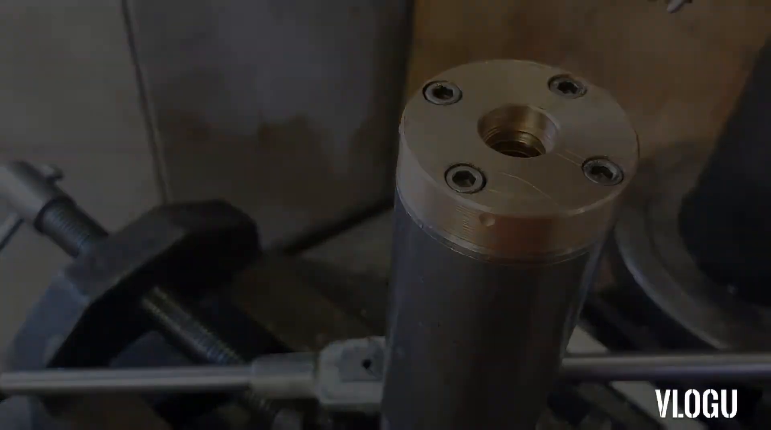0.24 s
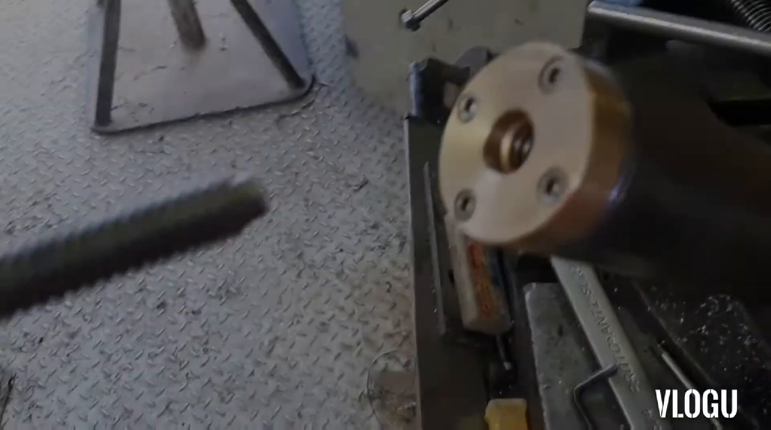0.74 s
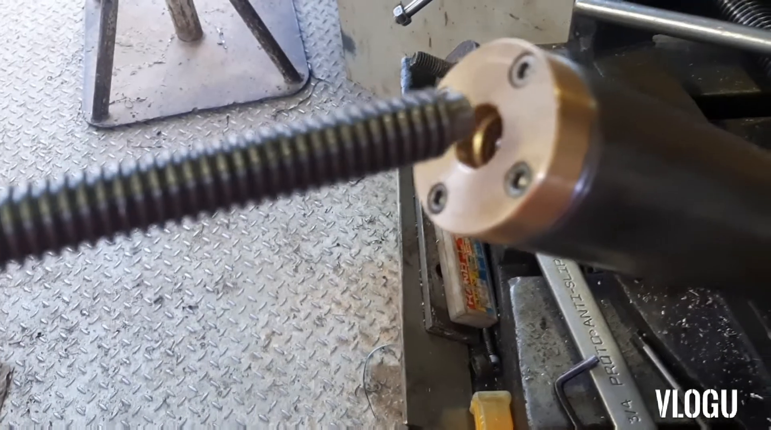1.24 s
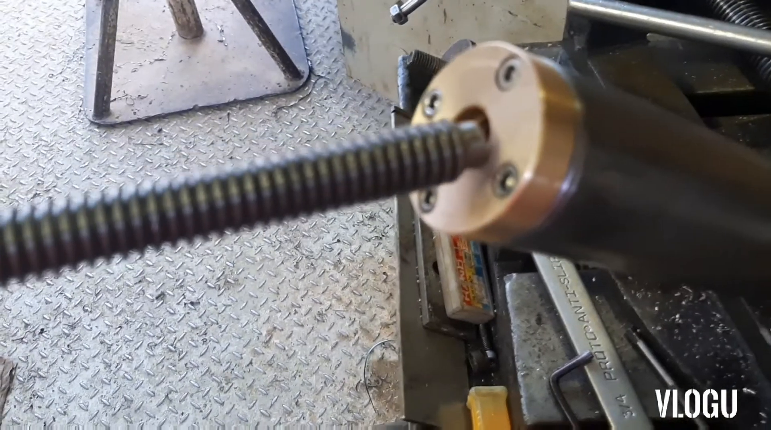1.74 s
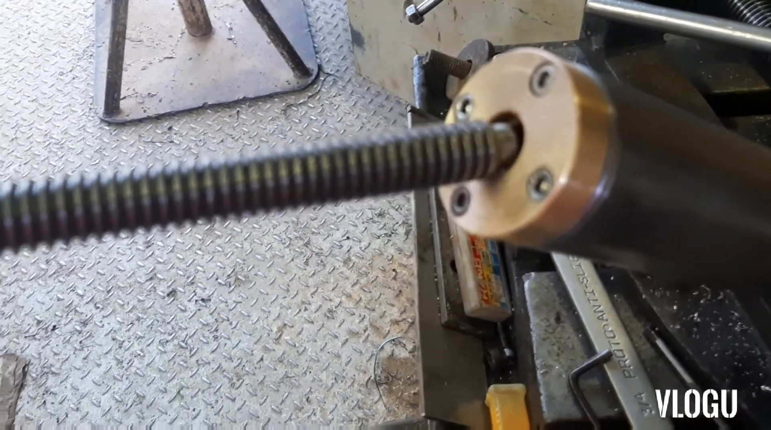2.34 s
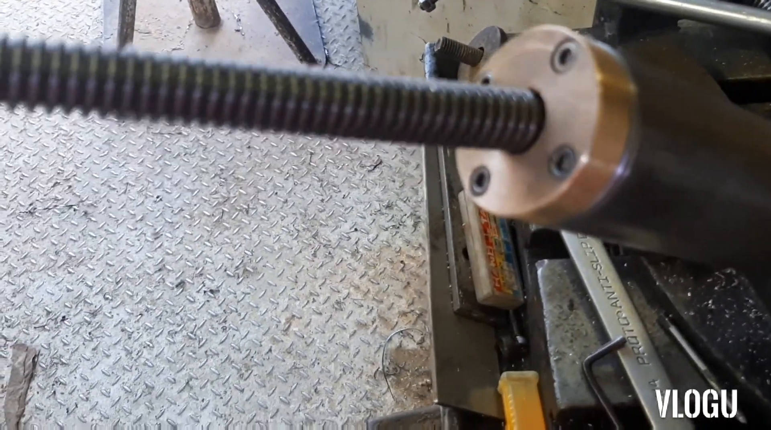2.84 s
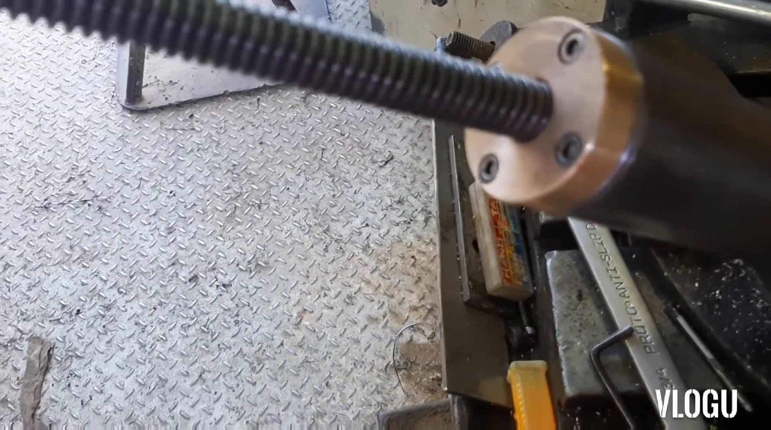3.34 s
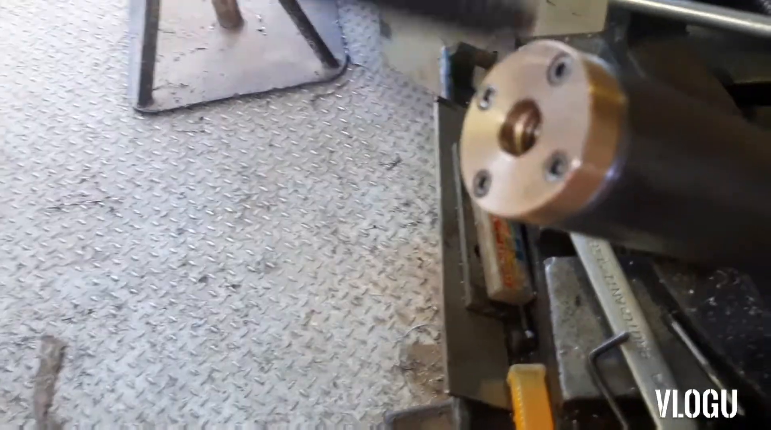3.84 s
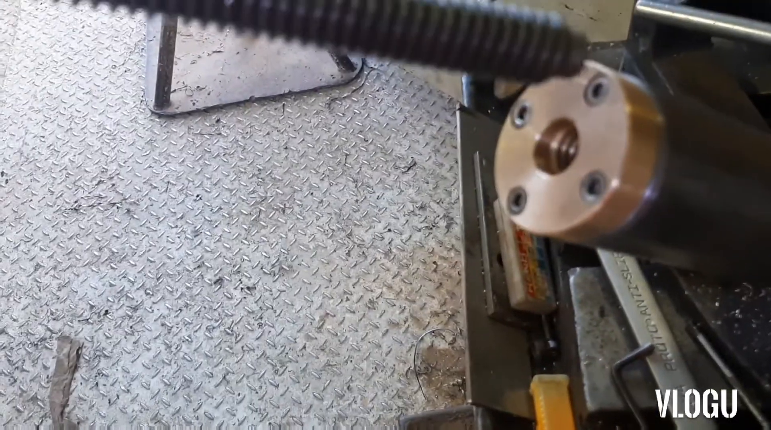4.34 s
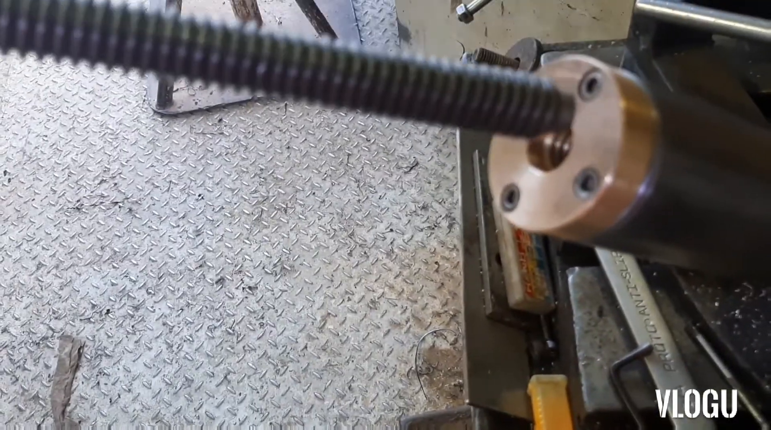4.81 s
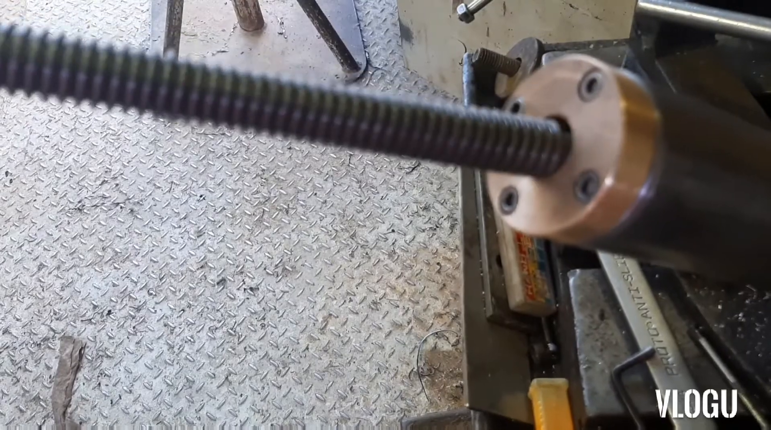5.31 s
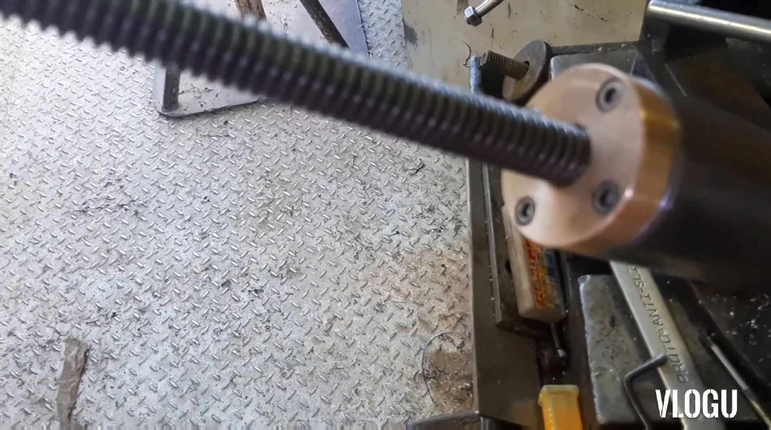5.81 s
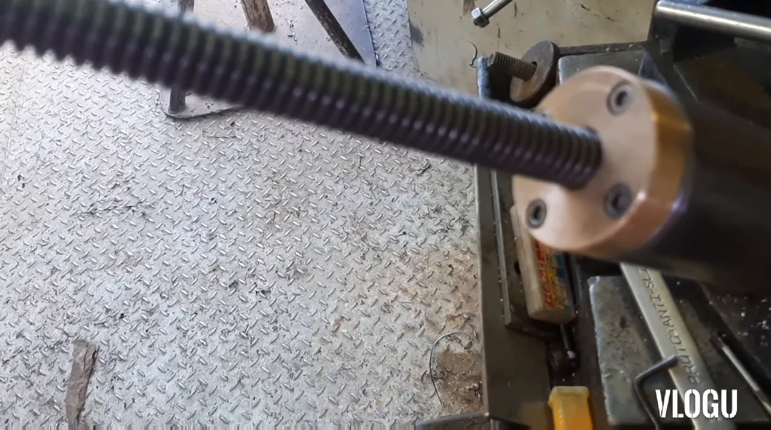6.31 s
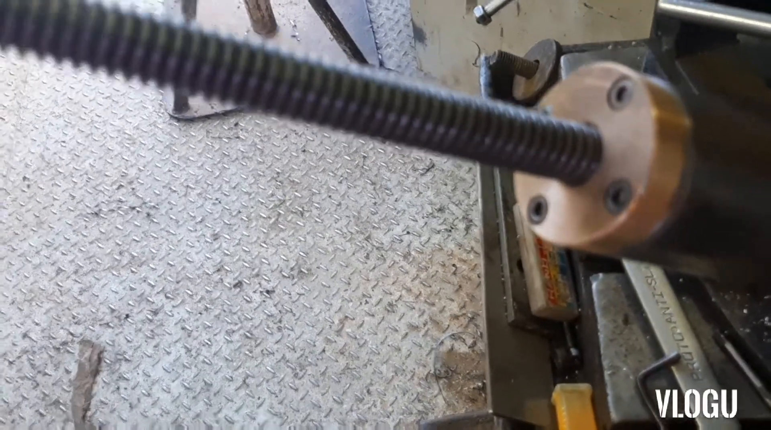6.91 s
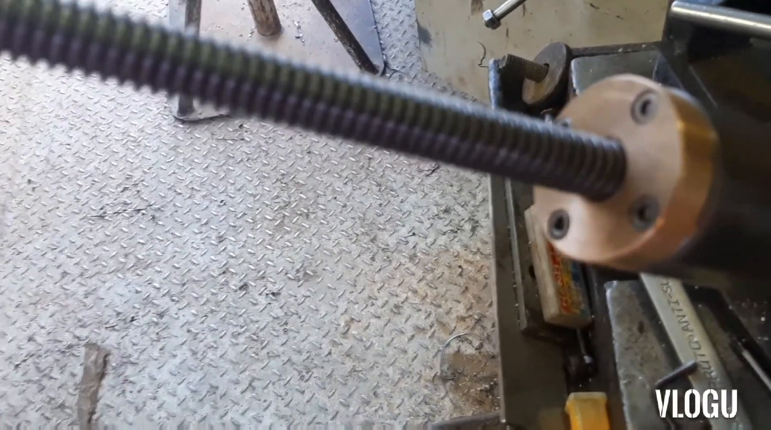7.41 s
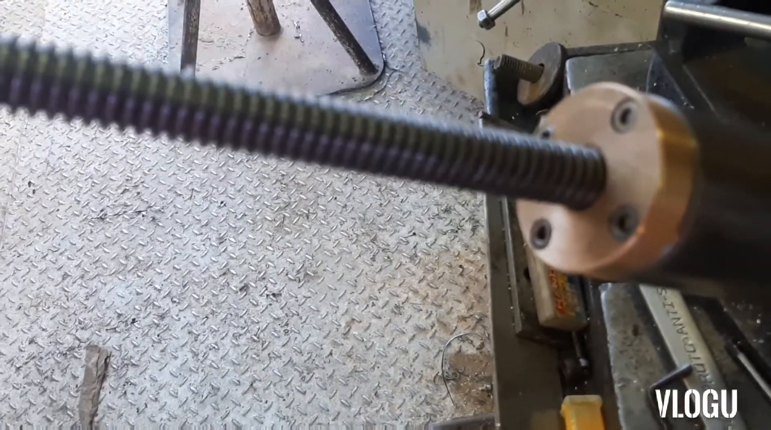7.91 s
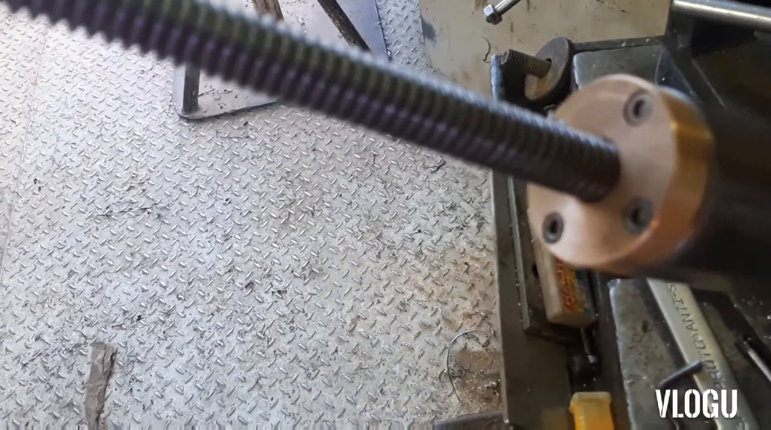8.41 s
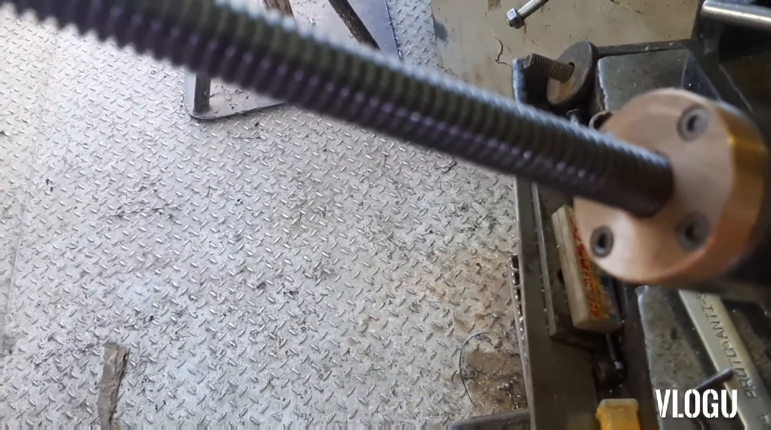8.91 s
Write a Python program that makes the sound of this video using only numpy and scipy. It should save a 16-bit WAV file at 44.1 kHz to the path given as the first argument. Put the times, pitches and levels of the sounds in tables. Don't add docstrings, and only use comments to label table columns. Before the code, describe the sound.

Low, beating motor drone with muffled airy noise fills a small workshop, picked up by a close hand-held microphone. A tiny opening burst is followed by a short dead gap, then the drone resumes quietly and abruptly doubles in level. Over it come a few dry metallic taps, the sharpest ones in quick clusters before four and six seconds, with a slight room reflection. The drone continues to the end.

```python
import sys
import numpy as np
from scipy import signal
from scipy.fft import rfft, irfft
from scipy.io import wavfile

SR = 44100
rng = np.random.default_rng(int(sys.argv[2]) if len(sys.argv) > 2 else 0)


def nominal_scale(level):
    x = np.asarray(level, float) / 20
    return 10 ** x


def wav_record(signal):
    frames = np.transpose(np.atleast_2d(signal))
    bounded = np.clip(frames, -1, 1)
    quanta = np.round(bounded * 32767).astype(np.int16)
    wavfile.write(sys.argv[1], SR, quanta)


N = 403515

# start in seconds, end in seconds, gain in dB, motor time shift in seconds.
STRETCHES = [
    (0, .1257, -6, 1.216),
    (.31, .355, -6, 1.0315),
    (.355, 1.192, -6, 0.),
    (1.192, 9.2, 0, 0.),
]
# time in seconds, extra distance in metres, main hum gain in dB.
HAND_SWAY = [(.6, -.3, .5), (2.3, -.14, 0), (4.3, .13, -.5), (5.5, .02, 1), (6.2, -.1, .5),
             (7.2, .02, -1.3), (8, .08, 0), (9.15, .1, 0)]
# multiple of the pull, level in dB rms.
HUM_TONES = [(1, -26.5), (2, -43), (3, -48.5), (4, -54)]
# shaft order, level in dB rms.
KNOCK_ORDERS = [(2, -60), (3, -42.2), (4, -52.7), (5, -36.8), (6, -39.3), (7, -53), (12, -48), (24, -56),
                (30, -67)]
# shaft orders above the pull, level in dB rms.
GAP_ORDERS = [(1, -37.7), (2, -37.2), (3, -47), (4, -53), (5, -60)]
# frequency in Hz,
# level in dB rms, start in cycles.
OTHER_TONES = [(90.02, -43, .11), (70.02, -57, 0), (74.98, -54, .3), (80.02, -55, .6), (299.17, -58, .7),
               (447.5, -58, .2), (565.2, -59, .5), (4255.4, -69, 0)]
# frequency in Hz, density in dB per Hz.
AIR_SPECTRUM = [(25, -17.5), (45, -13), (64, -9), (130, 0.5), (230, 1), (400, -6.5), (700, -8.5),
                (1100, -15.5), (2100, -13.5), (3500, -23), (5500, -24.5), (8000, -28.5), (8600, -33),
                (12000, -27)]
# centre in Hz, width in Hz, peak or dip in dB.
HOUSING_PEAKS = [(35.8, 14, -5), (55.3, 9.4, 11), (140, 10, -10), (161, 11, -7), (195, 5.5, -5.5),
                 (286, 10, -8), (310, 10, -4.5), (327, 14, 1), (349.2, 24, 3.5), (394, 12, -1),
                 (407, 21, 8), (438, 8.1, -5.5), (442, 8.7, 9.5), (482, 19, -6), (530, 9.5, -3),
                 (549, 113, 4), (639, 14, 2.5), (719.6, 12, 8), (732, 27, -0.5), (895, 23, -2),
                 (1233, 16, 5.5), (1486, 270, 4), (2034, 52, 5), (2650, 90, -0.5), (3060, 90, 1.5),
                 (4200, 440, 3), (15500, 4600, -3)]
# start in seconds, peak in dB, crack above 5 kHz in dB, brightness in dB per octave.
ROD_TAPS = [(2.153, -27, -24, -14), (2.5606, -39, -18, -3), (3.055, -30, -30, -14), (3.19, -23, -20, -4),
            (3.782, -27.5, -22, 1), (3.8196, -15, -7, 1), (3.8224, -16, -3, 3), (5.659, -14.5, -28, 9),
            (5.662, -16.5, -11, -8), (5.6749, -18, -18, 1), (5.7519, -21, -28, -6), (5.755, -19, -30, -4),
            (7.4265, -45, 11, 0)]
# frequency in Hz, level in dB, t60 in seconds.
NUT_MODES = [(1150, -19, .012), (1620, -11, .014), (2090, -9, .014), (2570, -4, .03), (2850, -12, .012),
             (3080, 0, .02), (3300, -12, .01), (3900, -9, .01), (4330, -6, .016), (4600, -10, .014),
             (5500, -19, .01), (6400, -18, .01)]
# frequency in Hz, level in dB, t60 in seconds.
ROD_MODES = [(2200, -5, .1), (2560, -10, .09), (3474, -3, .15), (4264, -15, .14), (4490, -11, .16),
             (6740, -11, .25), (7910, -19, .08), (9000, -18, .05)]

PULL_HZ, SHAFT_HZ = 120.024, 29.56
FRAME_HZ = 135
PULL_TURN, KNOCK_TURN, GAP_TURN = .05, .746, .62
HUM_LAG, KNOCK_LAG, GAP_LAG = -.21, -.21, -.32
NULL_DB_PER_M, NULL_DB = 7, 1.5
AIR_DB = -35.5
WHINE_HZ, WHINE_WIDTH_HZ, WHINE_DB = 1520, 42, -51.5
TURN_S, TURN_TAKES_S, TURN_LOSS_DB = 2.1, 6.7, 7
CONTACT_MS, BITE_MS = 2.5, .6
GRIT = .18
THIN_HZ = 700
LOOSE_S, ROD_DB, GRIPPED_DB = 3.818, -14, -22
ROOM_DB, ROOM_T60_S = -13.5, .25
TOP_HZ = 15760


def sway():
    s, metres, gain_db = np.transpose(HAND_SWAY)
    return [np.interp(np.arange(N) / SR, s, column) for column in (metres, gain_db)]


def drift(rate):
    r = np.exp(-80 * np.pi * rate / SR)
    slow = signal.lfilter([1], [1, -2 * r, r * r], rng.standard_normal(N // 40 + 2002))
    slow = slow[2000:]
    slow = (slow - slow.mean()) / slow.std()
    return np.interp(np.arange(N) / 40, np.arange(len(slow)), slow)


def tone(cycles, level_db, wobble_db):
    strength = np.sqrt(2) * nominal_scale(level_db + wobble_db * drift(0.96))
    return strength * np.cos(2 * np.pi * cycles)


def motor(t):
    pull, shaft = PULL_HZ * t, SHAFT_HZ * t
    metres, gain_db = sway()
    hum = [tone(k * (pull + PULL_TURN) + HUM_LAG, db, wobble_db=.4 * k) for k, db in HUM_TONES[1:]]
    main_strength = np.sqrt(2) * nominal_scale(HUM_TONES[0][1] + gain_db)
    hum.append(main_strength * np.cos(2 * np.pi * (pull + PULL_TURN + HUM_LAG)))
    knock = {}
    for k, db in KNOCK_ORDERS:
        opposite = .5 * (k * SHAFT_HZ < FRAME_HZ)
        knock[k] = tone(k * (shaft + KNOCK_TURN) + KNOCK_LAG + opposite, db, wobble_db=.11 * k)
    knock[12] *= nominal_scale(NULL_DB + NULL_DB_PER_M * metres)
    gap = [tone(pull + k * (shaft + GAP_TURN) + GAP_LAG, db, wobble_db=.35 * k) for k, db in GAP_ORDERS]
    others = [tone(hz * t + start, db, wobble_db=1.0) for hz, db, start in OTHER_TONES]
    return sum(hum + gap + others) + sum(knock.values())


def colour(x, points, peaks):
    hz = np.maximum(np.fft.rfftfreq(N, 1 / SR), 10)
    points_hz, points_db = np.transpose(points)
    gain_db = np.interp(np.log(hz), np.log(points_hz), points_db)
    for at_hz, width, top_db in peaks:
        gain_db += top_db / (1 + (2 * (hz - at_hz) / width) ** 2)
    return irfft(rfft(x) * nominal_scale(gain_db), N)


def air(patchy_db):
    spectrum = rfft(rng.standard_normal(N))
    hz = np.fft.rfftfreq(N, 1 / SR)
    together = drift(6)
    edges = 20 * 2. ** np.arange(11)
    out = np.zeros(N)
    for low, high in zip(edges, edges[1:]):
        band = irfft(spectrum * ((hz >= low) & (hz < high)), N)
        out += band * nominal_scale(patchy_db * (1.9 * together + drift(27)))
    out = colour(out, AIR_SPECTRUM, HOUSING_PEAKS)
    return nominal_scale(AIR_DB) * out / out.std()


def whine():
    r, w = np.exp(-np.pi * WHINE_WIDTH_HZ / SR), 2 * np.pi * WHINE_HZ / SR
    pole = [1, 0, -1, 1, -2 * r * np.cos(w), r * r]
    narrow = signal.sosfilt([pole, pole], rng.standard_normal(N))
    turned = np.clip((np.arange(N) / SR - TURN_S) / TURN_TAKES_S, 0, 1)
    return nominal_scale(WHINE_DB - TURN_LOSS_DB * turned) * narrow / narrow.std()


def rings(push, modes, t, tilt_db):
    out = np.zeros(len(t))
    chances = rng.normal(0, 1.5, (len(modes), 2))
    for (hz, db, t60), (chance_db, turn) in zip(modes, chances):
        envelope = nominal_scale(-60 * t / t60) * np.tanh(1000 * t / BITE_MS)
        free = envelope * np.sin(2 * np.pi * (hz * t + turn))
        mode = signal.fftconvolve(push, free)[:len(t)]
        mode_db = db + chance_db + tilt_db * np.log2(hz / 3100)
        out += nominal_scale(mode_db) * mode / abs(mode).max()
    return out


def taps():
    out, t = np.zeros(N), np.arange(SR // 4) / SR
    bright = signal.butter(4, [5200, 13300], "band", fs=SR, output="sos")
    blow = np.exp(-10000 * t)
    for s, peak_db, crack_db, tilt_db in ROD_TAPS:
        contact = np.exp(-1000 * t / CONTACT_MS) * np.tanh(1000 * t / BITE_MS)
        scrape = rng.standard_normal(len(t)) * contact
        rod_db = ROD_DB if abs(s - LOOSE_S) < .003 else GRIPPED_DB
        nut = rings(blow + GRIT * scrape, NUT_MODES, t, tilt_db)
        body = nut + nominal_scale(rod_db) * rings(blow, ROD_MODES, t, 0)
        crack = nominal_scale(crack_db) * signal.sosfilt(bright, scrape)
        at = round(s * SR)
        out[at:at + len(t)] += nominal_scale(peak_db) * (body / abs(body).max() + crack)
    return signal.sosfilt(signal.butter(3, THIN_HZ, "high", fs=SR, output="sos"), out)


def workshop(x):
    t = np.arange(SR // 2) / SR
    dull = signal.lfilter([1], [1, -.4], rng.standard_normal(len(t)))
    tail = dull * nominal_scale(-60 * t / ROOM_T60_S) * (t > .005)
    tail /= np.sqrt(np.sum(tail ** 2))
    return x + nominal_scale(ROOM_DB) * signal.fftconvolve(x, tail)[:N]


def scene():
    t = np.arange(N) / SR
    shift = sum(shift_s * ((t >= a) & (t < b)) for a, b, db, shift_s in STRETCHES)
    heard = t + shift - sway()[0] / 343
    return (motor(heard) + air(patchy_db=0.33) + whine() + workshop(taps()))[None]


def low_pass(x):
    return signal.sosfilt(signal.butter(12, 16000, fs=SR, output="sos"), x)


def record(dry):
    t = np.arange(N) / SR
    gain = sum(nominal_scale(db) * ((t >= a) & (t < b)) for a, b, db, shift_s in STRETCHES)
    top_cut = signal.ellip(14, .3, 70, TOP_HZ, fs=SR, output="sos")
    mix = signal.sosfilt(top_cut, dry * gain)
    return low_pass(mix)


dry = scene()
out = record(dry)
wav_record(out)
```